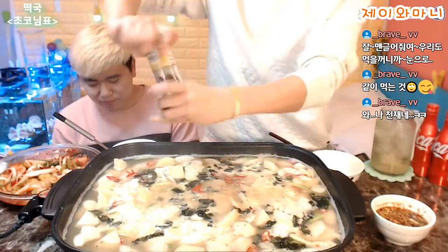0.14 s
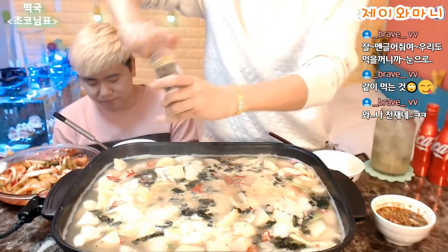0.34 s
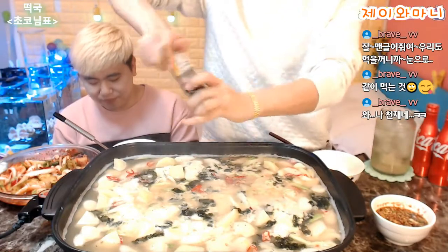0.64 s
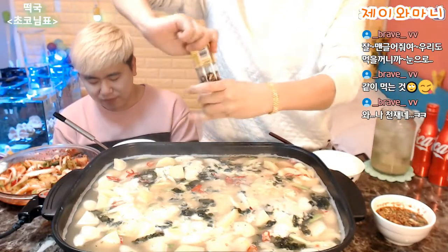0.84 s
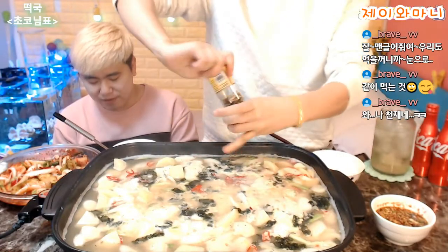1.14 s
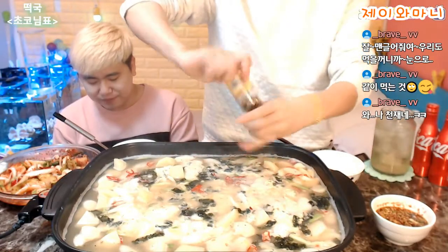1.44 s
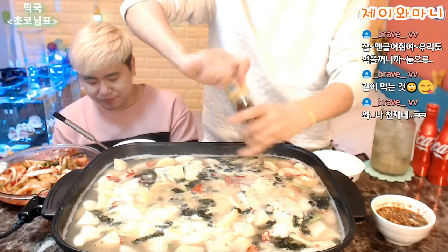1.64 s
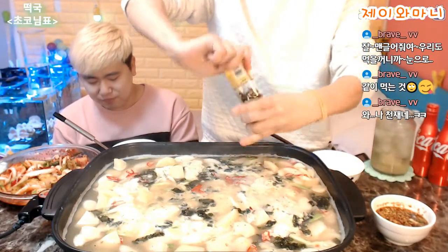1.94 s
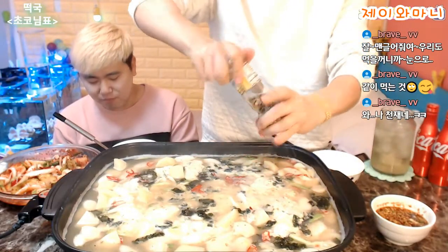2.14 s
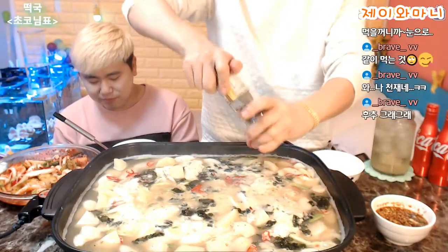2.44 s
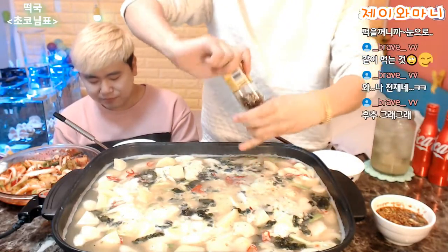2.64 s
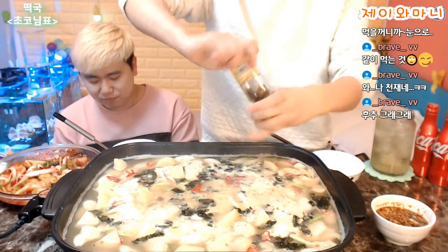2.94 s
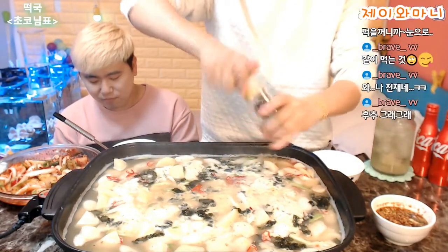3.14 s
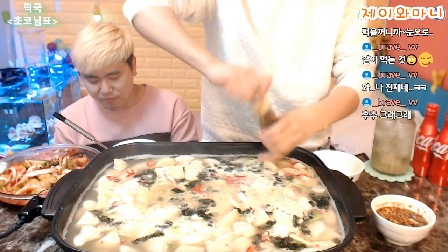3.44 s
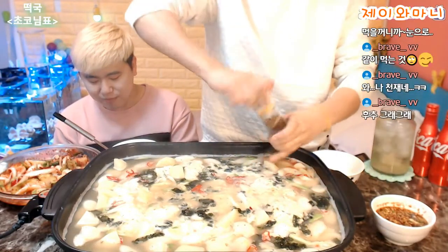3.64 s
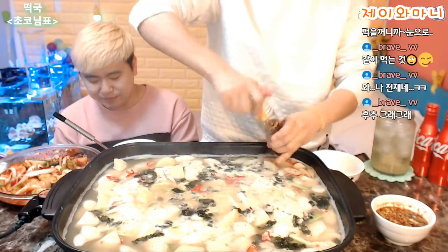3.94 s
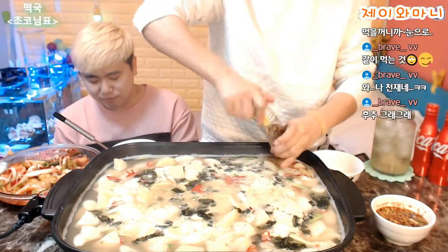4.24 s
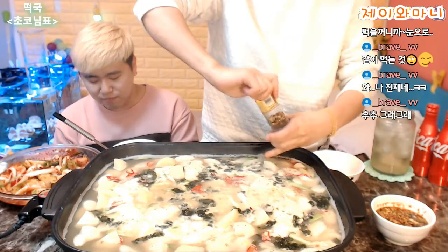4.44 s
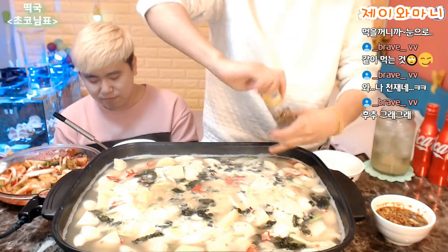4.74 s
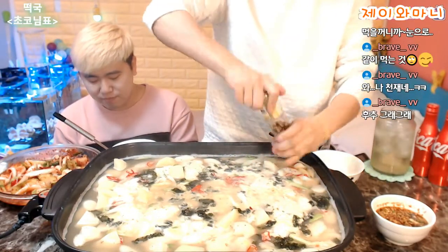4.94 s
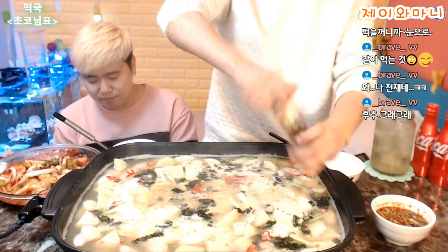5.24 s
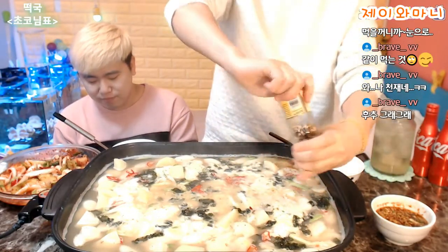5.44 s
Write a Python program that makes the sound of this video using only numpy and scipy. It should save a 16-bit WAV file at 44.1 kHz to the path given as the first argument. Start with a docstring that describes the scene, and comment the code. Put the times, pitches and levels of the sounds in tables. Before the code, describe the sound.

A pepper grinder is twisted by hand close to the microphone: hard, gritty twists with sharp peppercorn cracks alternate with lighter, quieter turns back, from start to finish. Underneath lie a faint simmering hiss with tiny bubbles from a wide pan and a very low electric hum. Small, fairly dry room, nearly mono, with slightly dulled top end.

```python
"""Pepper mill over a simmering pan

A handheld pepper mill is twisted to and fro over a simmering pan in a small room, with a mains hum below.
Peppercorns crack in short noise bursts and grit crunches under each turn; both ring the mill's body. The pan is
shaped noise with small popping bubbles, and the hum is a few low tones. Echoes and a short tail make the room;
the sound is almost mono, with a faint fuzz that differs left and right."""
import sys
import numpy as np
from scipy import signal
from scipy.io import wavfile
from scipy.ndimage import uniform_filter1d

SR = 44100
rng = np.random.default_rng(int(sys.argv[2]) if len(sys.argv) > 2 else 0)


def log_audio(samples):
    """Write samples as a 16-bit WAV file to the path given in sys.argv[1]."""
    # one column per channel
    frames = np.atleast_2d(samples).T
    # limit to full scale, then quantise
    limited = np.clip(frames, -1, 1)
    pcm = np.round(limited * 32767).astype(np.int16)
    wavfile.write(sys.argv[1], SR, pcm)


N = 246078  # length [samples]

# low tones of the heater, before they waver: (frequency [Hz], rms level [dB])
HUM_TONES = [(60, -80), (120, -63.5), (300, -77.5)]
# colour of pan and room air, only relative: (frequency [Hz], level per Hz [dB])
SIMMER_COLOUR = [(15, -19), (31, 10.5), (48, 6), (90, -4), (119, 3), (173, -10), (473, -4), (1030, -7.5),
                 (2250, -9.5), (3190, -17.5), (5690, -13), (10200, -24), (13200, -44), (22000, -120)]
SIMMER_DB = -55  # rms level of the hiss alone

# how the room rings on: (frequency [Hz], time to fall by 60 dB [s], tail level [dB])
ROOM_TAIL = [(293, 0.13, -1), (990, 0.014, 2), (2030, 0.18, -6.5), (5260, 0.15, -6), (7800, 0.17, -7),
             (9500, 0.13, -2)]
# pan, table and wall, level in each set of taps: (delay [s], level [dB])
NEAR_ECHOES = [(.0035, -15), (.0085, -23.5), (0.01, -28.5), (0.017, -44)]

# resonances of the mill's parts, levels relative within a part: (frequency [Hz], width [Hz], level [dB])
CAP_MODES = [(3933, 980, -8.5), (4472, 670, -9.5), (5089, 1000, 0.5), (5570, 189, 4), (5740, 113, 2.5)]
JAR_MODES = [(1683, 89, 1), (1813, 295, 4)]
NECK_MODES = [(2240, 317, 9.9), (2905, 90, 1.7)]
EDGE_MODES = [(7236, 900, 6), (8130, 1900, -2.5)]
GRIP_MODES = [(316, 88, 1), (439, 97, 4), (720, 660, 2), (1264, 480, -6.5)]
PARTS = CAP_MODES, JAR_MODES, NECK_MODES, EDGE_MODES, GRIP_MODES

# the mill's colour drifts, perhaps as the hands shift: (time [s], neck over jar [dB], edge [dB])
HOLD_DRIFT = [(0, -9, 6), (.45, -1, 5.5), (1.0, 2, 1), (1.7, 0, -2.5), (2.1, 10.5, 2.5), (2.45, 12, 6.5),
              (2.8, 3, 0.5), (3.2, 6, 4.5), (3.5, -10, -6), (3.8, -4, 0), (4.1, -3, 1), (4.5, 0, 6),
              (4.9, -8.5, 3.5), (5.3, 8, -2.5)]
# turns of the hand, a hard twist and a light turn back by turns; levels before each part's own offset:
# (peak time [s], length [s], peak level [dB], hollowness [dB], rumble in the grip [dB])
HAND_TURNS = [(0.0, 0.35, -41, -5.5, -60), (0.188, .17, -26.5, -4, -52), (0.341, 0.37, -43, -3.5, -60),
              (0.523, 0.12, -31, 3.5, -46.5), (0.716, 0.33, -43.5, -2.5, -59.5),
              (0.925, 0.23, -30.5, -5.5, -55), (1.109, .15, -36, -9.5, -62), (1.292, 0.23, -32, -8, -57.5),
              (1.478, 0.39, -41.5, -8, -58), (1.677, 0.22, -28, -7.5, -55.5),
              (1.859, 0.33, -41.5, -5.5, -54.5), (2.034, 0.22, -32.5, -4.5, -57.5),
              (2.185, 0.37, -46, -4, -59), (2.393, 0.1, -24, -8, -48), (2.571, 0.12, -37, -3, -56.5),
              (2.758, 0.29, -35.5, -4, -54.5), (2.925, 0.18, -41, -2, -61), (3.134, .14, -22.5, -12.5, -50),
              (3.298, 0.13, -34.5, -6.5, -50), (3.499, 0.18, -25.5, -7, -49.5), (3.654, 0.3, -41, -5, -56),
              (3.843, .14, -28.5, -6.5, -52.5), (4.011, 0.26, -45.5, -1.5, -61.5),
              (4.185, 0.071, -24.5, -31, -52), (4.353, 0.25, -44.5, 0.5, -55),
              (4.539, 0.26, -36.5, -5, -56), (4.71, 0.22, -43.5, 2, -57.5),
              (4.905, 0.17, -31.5, -17, -51.5), (5.062, 0.23, -46.5, -15, -59.5),
              (5.245, 0.2, -32.5, -3.5, -51.5), (5.43, 0.65, -52.5, 1, -59)]
RISE_SHARE = 0.49  # share of its length for which a turn swells
ENDS_DB, GRIP_ENDS_DB = -35.5, -15.5  # ends of a turn against its peak; the grip swells more gently

# peppercorns cracking, hollowness being jar and neck against the crack; before each part's own offset:
# (time [s], strength [dB], hollowness [dB])
CORN_CRACKS = [(0.1596, -25.5, -7), (0.1675, -19.5, -13.5), (0.1757, -30, -3), (0.1828, -17.5, -6.5),
               (0.1896, -20.5, -12), (0.2356, -18.5, -14), (0.3007, -32.5, -10.5), (0.4906, -19.5, -17.5),
               (0.506, -7.5, -21), (0.5278, -3.5, -33), (0.5611, -9.5, -12), (0.6362, -27.5, -3),
               (0.6516, -32, -2.5), (0.6949, -31, -8.5), (0.7796, -34, -9), (0.877, -27, -17),
               (0.891, -20.5, -14), (0.9206, -17, -17), (0.9346, -18.5, -21), (0.9459, -21, -9.5),
               (1.0151, -27, -5), (1.0667, -24, -12), (1.0814, -7, -29), (1.2416, -23.5, -14),
               (1.2506, -26.5, -14), (1.2803, -12, -21), (1.2953, -18.5, -9.5), (1.342, -24.5, -12.5),
               (1.3955, -34.5, -9), (1.437, -30.5, -11), (1.4549, -23, -10.5), (1.5249, -37.5, 2.5),
               (1.6285, -24.5, -19), (1.6414, -10.5, -28), (1.6548, -22, -8), (1.6796, -5, -11.5),
               (1.6954, -9, -20), (1.803, -18.5, -4.5), (2.0162, -12, -14.5), (2.0383, -14, -14.5),
               (2.0508, -22, 0), (2.0689, -31, -1.5), (2.083, -19.5, 1), (2.165, -30, -2.5),
               (2.1864, -35, -21), (2.2535, -44, -6.5), (2.3515, -30.5, -10), (2.3727, -33, -5),
               (2.381, -22, -7), (2.385, -24, -6.5), (2.3989, -21.5, -10), (2.4231, -5.5, -13.5),
               (2.4289, -13, -13), (2.4335, -7.5, -21), (2.5137, -34.5, -12), (2.5649, -29.5, -3),
               (2.7323, -23, -12.5), (2.7454, -14.5, -18), (2.7592, -23.5, -10), (2.7691, -11, -15),
               (2.862, -37, -5.5), (2.9228, -32, -13), (2.9718, -33, -14), (3.1049, -24, -9),
               (3.1205, -20, -12.5), (3.134, -13, -28), (3.1376, -11, -39), (3.1458, -15.5, -15),
               (3.1655, -19.5, -13), (3.2438, -32.5, -12), (3.2911, -17, -21), (3.4758, -18, -27),
               (3.5009, -5.5, -38), (3.5104, -15.5, -30), (3.5398, -11.5, -32), (3.5924, -30.5, -13),
               (3.6361, -25, -19), (3.8013, -19, -20), (3.8118, -17.5, -23), (3.8224, -20.5, -20),
               (3.8422, -14.5, -10), (4.0521, -33, -7), (4.1217, -32.5, -20), (4.1652, 1.5, -12),
               (4.215, -15, -15), (4.2216, -19, -20), (4.3754, -35.5, -20), (4.4887, -41, 3),
               (4.5136, -33.5, -5), (4.55, -34, -1), (4.565, -12.5, -16), (4.837, -18, -11),
               (4.8732, -18, -15), (4.884, -26, -13), (4.9128, -8, -20), (4.921, -40, -34),
               (4.9662, -17, -27), (5.0372, -34, -11), (5.0684, -37.5, -8.5), (5.1177, -44.5, 6),
               (5.2389, -28, -7), (5.2474, -26, -6), (5.2686, -20, -17), (5.35, -28.5, -10.5),
               (5.465, -33, -13.5)]

# colour of the faint left-right fuzz: (frequency [Hz], level [dB])
FUZZ_COLOUR = [(60, -46.5), (400, -51.5), (1500, -55), (4000, -53.5), (9000, -51)]
TOP_HZ = 10100  # band limit of the sound


def gain_of(db):
    """Turns decibels into a factor."""
    return 10 ** (np.asarray(db) / 20)


def evened(x):
    """Scales a sound to an rms of 1."""
    return x / np.sqrt(np.mean(x ** 2) + 1e-20)


def read(points, hz, axis=1):
    """Reads one column of a table that starts with frequency, between its rows on a log scale."""
    points = np.transpose(points)
    return np.interp(np.log(hz + 1), np.log(points[0] + 1), points[axis])


def wander(per_s):
    """Slow random drift of rms 1: noise averaged twice over 1 / per_s seconds."""
    width = int(SR / per_s)
    once = uniform_filter1d(rng.standard_normal(N), width)
    return evened(uniform_filter1d(once, width))


def hum():
    """Low steady tones of the heater, each wavering in level."""
    t = np.arange(N) / SR
    total = np.zeros(N)
    for hz, db in HUM_TONES:
        level = gain_of(db + 0.81 * wander(13)) * np.sqrt(2)  # a sine peaks at root 2 times its rms
        total += level * np.sin(2 * np.pi * (hz * t + rng.random()))
    return total


def simmer():
    """Steady rumble and patchy hiss of the pan, with small bubbles popping as short rising tones."""
    frames, freqs = N // 256 + 5, np.fft.rfftfreq(1024, 1 / SR)
    real, imag, patches = rng.standard_normal((frames, 513, 3)).T
    patches = uniform_filter1d(patches, 16, 0)  # neighbouring frequencies
    patches = evened(uniform_filter1d(patches, 6, 1))  # neighbouring moments
    patchy_db = 4.2 * np.clip(freqs / 2500, 0, 1)  # the rumble stays even
    level_db = read(SIMMER_COLOUR, freqs)[:, None] + patchy_db[:, None] * patches
    spectrum = (real + 1j * imag) * gain_of(level_db)
    hiss = evened(signal.istft(spectrum, nperseg=1024, noverlap=768)[1][:N])

    t, pops = np.arange(900) / SR, np.zeros(N)
    for hz in np.geomspace(260, 1300, num=12):  # bubble sizes, by their starting pitch
        swell_and_fade = t * hz * np.exp(-t * hz / 0.75)
        bubble = np.sin(2 * np.pi * hz * (t + 6 * t ** 2)) * swell_and_fade
        starts = rng.exponential(1, N) * (rng.random(N) < 15 / SR)  # about 15 a second of each size
        pops += signal.oaconvolve(starts, bubble)[:N]
    return gain_of(SIMMER_DB) * (hiss + gain_of(-11.0) * evened(pops))


def room(x):
    """Near echoes, then a tail of sparse random taps in which each pitch fades at its own speed."""
    taps = np.zeros((3, SR // 2))
    # one tap of random sign somewhere in every slot of 10 samples
    slots = np.arange(100, SR // 2 - 20, 10)
    at = slots + rng.integers(0, 10, (3, (SR // 2 - 111) // 10))
    np.put_along_axis(taps, at, rng.choice([-1., 1.], at.shape), 1)

    hz, t, spectrum = signal.stft(taps, SR, nperseg=128)
    t60 = read(ROOM_TAIL, hz)[:, None]
    fade_db = read(ROOM_TAIL, hz, axis=2)[:, None] - 60 * t / t60
    # dividing by root t60 keeps long and short tails at comparable energy
    tail = signal.istft(spectrum * gain_of(fade_db) / np.sqrt(t60), SR, nperseg=128)[1]
    tail *= np.sqrt(6 * np.log(10) * 10 / SR)
    for delay_s, db in NEAR_ECHOES:
        tail[:, round(delay_s * SR)] += gain_of(db)

    # three random tap sets fade into one another 7 times a second, so the tail's colour stays even
    phase = 2 * np.pi * (7 * np.arange(N) / SR + np.arange(3)[:, None] / 3)
    shares = np.sqrt((1 + np.cos(phase)) / 3)
    return signal.fftconvolve(x * shares, tail, axes=1)[:, :N].sum(0)


def body(modes):
    """Ring of one part of the mill when struck: fading tones with steep resonances, of energy 1."""
    t = np.arange(2048) / SR
    ring = np.zeros(len(t))
    for hz, width, db in modes:
        envelope = width ** 2 * t * np.exp(-1.5 * np.pi * width * t)
        ring += gain_of(db) * envelope * np.sin(2 * np.pi * hz * t)
    return ring / np.linalg.norm(ring)


def hold(s):
    """Levels of jar, neck and edge in dB at the times s; jar and neck share a fixed power."""
    at, neck_db, edge_db = np.transpose(HOLD_DRIFT)
    ratio = gain_of(np.interp(s, at, neck_db)) ** 2
    jar = 10 * np.log10(1 / (1 + ratio))
    neck = 10 * np.log10(ratio / (1 + ratio))
    return np.array([jar, neck, np.interp(s, at, edge_db)])


def strokes():
    """Levels in dB of the treble, the hollow ring and the grip, rising and falling with each turn."""
    t = np.arange(N // 64 + 2) * 64 / SR  # a coarse clock is enough
    s, length, db, hollow_db, grip_db = np.transpose(HAND_TURNS)[:, :, None]
    # distance from the peak: 0 at the peak, 1 at either end of the turn
    away = np.maximum((s - t) / RISE_SHARE, (t - s) / (1 - RISE_SHARE)) / length
    high = db + ENDS_DB * away
    low = db + hollow_db + ENDS_DB * away
    grip = grip_db + GRIP_ENDS_DB * away
    curves = []
    for level in (high, low, grip):
        power = (gain_of(level) ** 2).sum(0)  # overlapping turns add up
        curves.append(np.interp(np.arange(N) / SR, t, 10 * np.log10(power + 1e-12)))
    return curves


def grit(per_s=1300, spread_db=4.5, rub=0.34, jar_db=-8, neck_db=-6, edge_db=-9, follow=0.29):
    """Small grains snap at random, in clumps, over the rub of the burrs; each part is struck unevenly."""
    high_db, low_db, grip_db = strokes()
    jar, neck, edge = follow * hold(np.arange(N) / SR)  # follows only part of the drift
    size_db = spread_db * np.minimum(rng.exponential(1, N), 3.5)
    size = gain_of(size_db + 3.3 * rng.standard_normal((5, N)))
    clumps = gain_of(4 * wander(60))
    grains = size * (rng.random(N) < per_s / SR * clumps)
    snaps = signal.lfilter([1], [1, -np.exp(-1 / (0.001 * SR))], grains)  # each fades over about 1 ms
    uneven = gain_of([0.76 * wander(150) for part in range(5)])
    drive = (evened(snaps) + rub) * uneven * rng.standard_normal((5, N))
    levels = [
        high_db - 6,  # cap
        low_db + jar_db + jar,
        low_db + neck_db + neck,
        high_db + edge_db + edge,
        grip_db]
    return evened(drive) * gain_of(levels)


def cracks(snap_s=0.00058, lead_s=0.005, lead_db=-23, grip_db=-32, cap_db=-3, hollow_db=6,
           edge_db=-10, vary_db=3):
    """Each corn breaks in a burst of about a millisecond that rings every part in its own colour."""
    s, db, low_db = np.transpose(CORN_CRACKS)
    jar, neck, edge = hold(s)
    low_db = db + low_db + hollow_db
    t = np.arange(-600, 256) / SR  # 0 is the break
    after = np.maximum(t, 0) / snap_s
    snap = np.e * after * np.exp(-after)
    # faint noise swells over a few milliseconds before the break
    lead_in = gain_of(lead_db) * np.exp(t / lead_s) * (t < 0)
    bursts = rng.standard_normal((len(s), 5, len(t))) * (snap + lead_in)

    rings = np.array([body(modes) for modes in PARTS])
    rung = signal.fftconvolve(bursts, rings[None], axes=2)
    rung *= 4.12 / np.linalg.norm(rung, axis=2, keepdims=True)  # same energy for every burst
    levels = gain_of([
        db + cap_db,
        low_db + jar,
        low_db + neck,
        db + edge_db + edge,
        db + grip_db]).T
    levels[:, 3] *= gain_of(vary_db * rng.standard_normal(len(s)))  # the edge differs from crack to crack
    mixed = (rung * levels[:, :, None]).sum(1)

    out = np.zeros(N + rung.shape[2])
    starts = np.round((s + t[0]) * SR).astype(int)
    for at, crack in zip(starts, mixed):
        out[at:at + len(crack)] += crack
    return out[:N]


def scene():
    """The mill in the room over the pan, all in the middle."""
    mill = cracks()
    for drive, modes in zip(grit(), PARTS):
        mill = mill + signal.oaconvolve(drive, body(modes))[:N]
    mid = mill + room(mill) + simmer() + hum()
    return np.array([mid, mid])


def record(dry):
    """A soft ceiling on the loudest peaks, a faint fuzz that differs left and right, then the band limit."""
    held = dry / (1 + abs(dry / .85) ** 5) ** (1 / 5)
    hz, t, spectrum = signal.stft(held[0], SR, nperseg=1024)
    # the fuzz follows the level, growing more slowly
    size = uniform_filter1d(abs(spectrum), size=5, axis=0) ** .55
    random_phase = np.exp(2j * np.pi * rng.random(spectrum.shape[::-1]).T)
    fuzz = size * gain_of(read(FUZZ_COLOUR, hz))[:, None] * random_phase
    side = signal.istft(fuzz, SR, nperseg=1024)[1][:N]
    wide = held + np.array([side, -side])
    lowpass = signal.firwin(301, TOP_HZ, window=("kaiser", 8), fs=SR)
    return signal.oaconvolve(wide, lowpass[None], "same")


dry = scene()
out = record(dry)
log_audio(out)
```